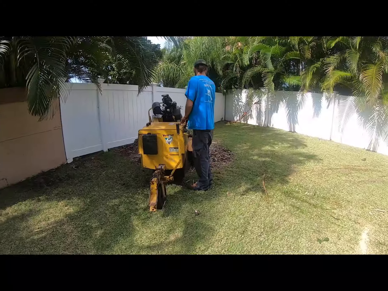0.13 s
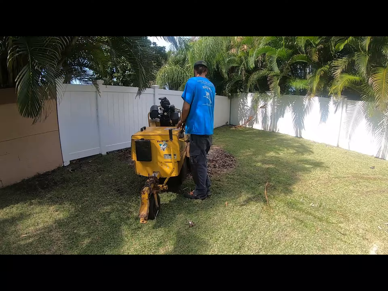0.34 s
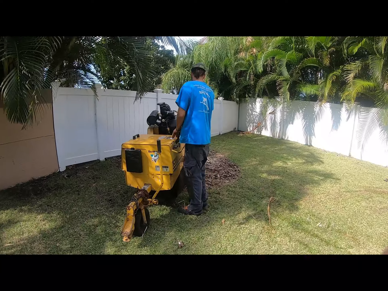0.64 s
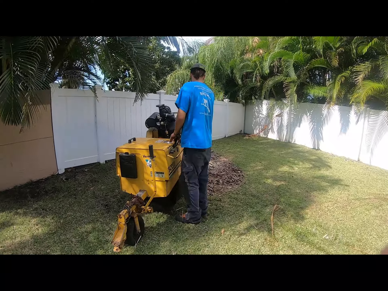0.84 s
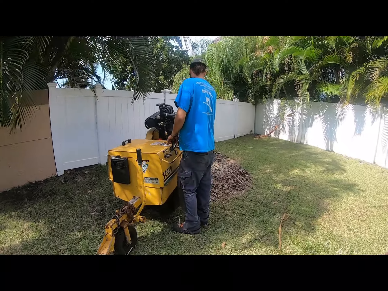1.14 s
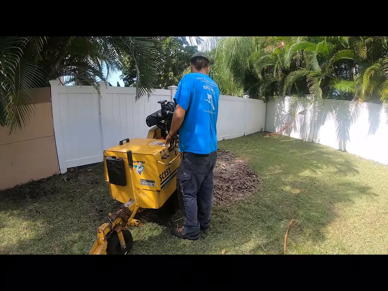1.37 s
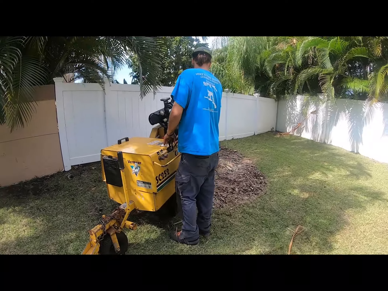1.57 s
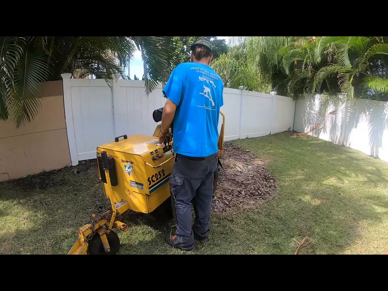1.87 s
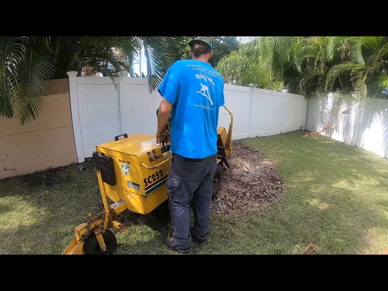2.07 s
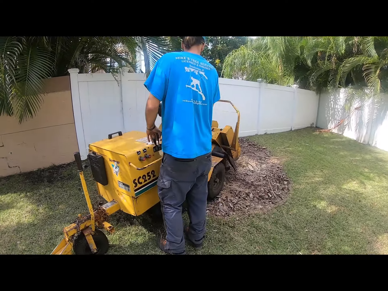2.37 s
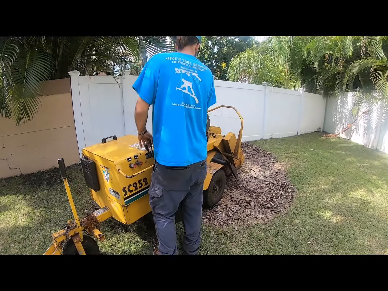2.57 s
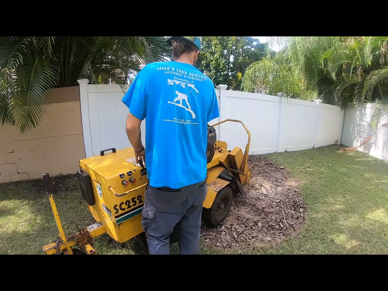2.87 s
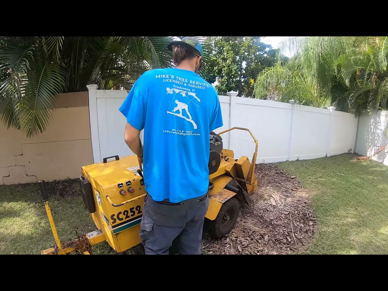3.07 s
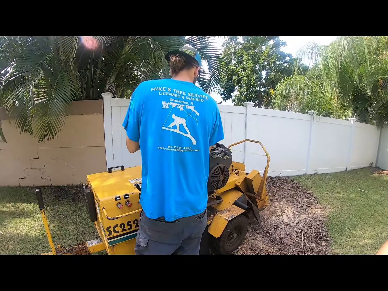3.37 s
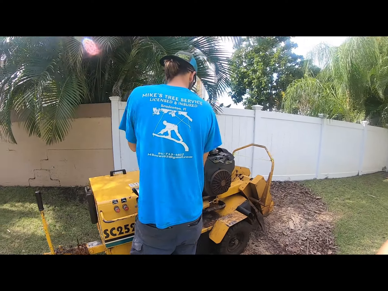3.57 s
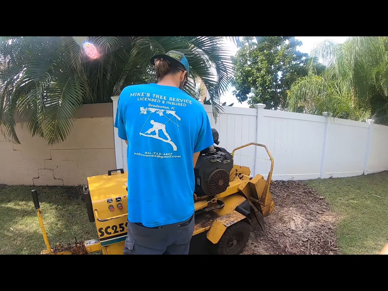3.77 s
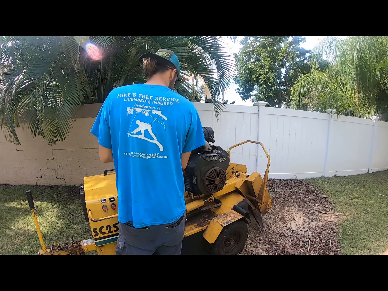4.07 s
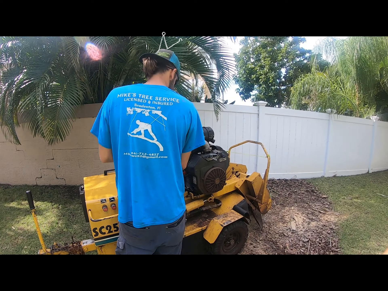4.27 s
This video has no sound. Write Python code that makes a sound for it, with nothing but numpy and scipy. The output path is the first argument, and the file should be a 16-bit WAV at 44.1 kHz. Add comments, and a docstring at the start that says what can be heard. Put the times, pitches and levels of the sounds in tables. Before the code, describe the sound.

After about 0.1 s of silence, a petrol stump grinder engine fades in within a tenth of a second, already running at speed in an open fenced yard. At first it is lighter, with a faint high whistle in the hiss until about 0.6 s. From 0.6 to 0.8 s the low exhaust boom swells strongly as the walking listener nears. The low, uneven two-cylinder throb, near 60 Hz, hunts gently: up around 0.65 s, down by 1.3 s, up near 2 s, sagging to its lowest at 3.5 s and partly recovering. Treble, fine valve ticking and thin whines are clearest around 1.2-1.9 s; more whine surfaces around 2.4-3 s. A brief roar surge and casing rasp come at 3.1-3.45 s. Fan noise then emerges, bass stays heavy, and the narrow image opens rightward. The steady roar is cut off abruptly at about 4.07 s, leaving silence.

```python
"""A fenced yard: a two-cylinder petrol stump grinder runs at speed while the listener walks round it with two microphones.
Its speed hunts slowly. Sines on multiples of the cycle give exhaust tones and whines from pump, fan and gears;
shaped noise gives roar, casing clatter and fan hiss; noise bursts in bright modes give a valve tick.
A faint high whistle lies in the hiss early on.
The sound fades in, stays narrow, opens to the right near the end and is cut off."""
import sys
import numpy as np
from scipy import signal
from scipy.fft import rfft, irfft
from scipy.io import wavfile

SR = 44100
rng = np.random.default_rng(int(sys.argv[2]) if len(sys.argv) > 2 else 0)


def inscribe(sig):
    """Save sig as 16-bit PCM at rate SR to the path in sys.argv[1].

    A 1-D sig is mono; a 2-D sig holds one channel per row.
    Samples are clipped to [-1, 1] before scaling.
    """
    pcm = np.round(np.clip(np.atleast_2d(sig).T, -1, 1) * 32767)
    wavfile.write(sys.argv[1], SR, pcm.astype(np.int16))


def ratio_of_db(decibels):
    """Turn decibels (scalar or array-like) into linear amplitude factors; 0 dB maps to 1."""
    return 10 ** (np.asarray(decibels, float) / 20)


N = 194569  # samples


def in_time(rows):
    """Turns the columns of a (time [s], ...) table into curves over all samples."""
    s, *columns = np.transpose(rows)
    return np.array([np.interp(np.arange(N) / SR, s, column) for column in columns])


def at_hz(points, hz, axis=1):
    """Reads one column of a spectrum on a log-frequency axis."""
    points = np.array(points)
    return np.interp(np.log(hz), np.log(points[:, 0]), points[:, axis])


def rms_one(x):
    """Scales to unit rms."""
    return x / np.sqrt(np.mean(x ** 2) + 1e-20)


def drift(rate_hz):
    """Slow chance with spread 1: noise through two equal low-pass poles, drawn at every 40th sample."""
    r = np.exp(-80 * np.pi * rate_hz / SR)
    white = rng.standard_normal(N // 40 + 4002)
    slow = signal.lfilter([1], [1, -2 * r, r * r], white)[4000:]  # settled part
    return np.interp(np.arange(N) / 40, np.arange(len(slow)), rms_one(slow - slow.mean()))


def resonance(x, hz, width_hz):
    """Two-pole resonance with gain 1 on top."""
    r = np.exp(-np.pi * width_hz / SR)
    poles = [1, -2 * r * np.cos(2 * np.pi * hz / SR), r * r]
    return signal.lfilter([(1 - r * r) / 2, 0, (r * r - 1) / 2], poles, x)


def stretch(start_s, end_s):
    """Rises softly from 0 to 1 round the start and sinks again round the end."""
    now = np.arange(N) / SR
    edge_s = .05
    return (np.tanh((now - start_s) / edge_s) - np.tanh((now - end_s) / edge_s)) / 2


# governor hunting: (time [s], engine speed [cycles/s])
ENGINE_SPEED = [(.1, 30.17), (.3, 30.3), (.65, 31.37), (.9, 30.42), (1.1, 28.93), (1.35, 28.7),
                (1.65, 29.96), (1.95, 31.38), (2.4, 31.11), (3.0, 30.37), (3.15, 29.4), (3.5, 27.83),
                (3.65, 28.13), (3.85, 29.28), (4.1, 29.3)]
START_TURN, TICK_TURN = -.068, .33  # crank position at the start and at the tick [cycles]


def crank_turns():
    """Adds up the hunting engine speed into the crank position in cycles."""
    return START_TURN + np.cumsum(in_time(ENGINE_SPEED)[0]) / SR


def working_noise(turns, repeating):
    """Part of the noise repeats every cycle, as the same parts meet again; the pattern changes over a few cycles."""
    steps = 1500  # contacts in one cycle
    patterns = rng.standard_normal((2, 40, steps))
    age = (turns + 1) / 5  # a new pattern every five cycles
    old = age.astype(int)
    blend = np.pi / 2 * (age % 1)
    contact = (turns % 1 * steps).astype(int)
    looped = patterns[:, old, contact] * np.cos(blend) + patterns[:, old + 1, contact] * np.sin(blend)
    return np.sqrt(repeating) * looped + np.sqrt(1 - repeating) * rng.standard_normal((2, N))


# muffler boom along the walk, before each band takes its share: (time [s], level [dB])
BOOM_ON_WALK = [(.2, -18.5), (.45, -15.5), (.8, -3.5), (1.5, -5), (2.1, -1), (2.6, 0.5), (3.1, 1), (3.5, 2),
                (4.1, 0.5)]
# treble along the walk, before each band takes its share: (time [s], level [dB])
TREBLE_ON_WALK = [(.2, -11), (.6, -10), (1.0, -5.5), (1.35, -4), (1.75, -2), (2.0, -6), (2.5, -8),
                  (3.2, -10), (3.45, -7.5), (4.1, -4.5)]
# brief surges of the exhaust roar, before the shares: (time [s], half-length [s], level [dB])
ROAR_SURGES = [(.56, 0.12, 8.5), (.92, 0.19, 4.5), (3.14, .12, 7), (3.35, .1, 3.5)]
# the fan side comes out from behind the operator: (from time [s], to time [s])
FAN_COMES_OUT = (2.81, 3.96)
# the casing rasps briefly, before the shares: (from time [s], to time [s], level [dB])
CASING_RASP = (3.25, 3.45, 3)
# noise reaching the listener: (frequency [Hz], level [dB], share of boom, share of treble, share of surges,
# gain with the fan fully in view [dB], share of rasp)
NOISE_REACH = [(152, -23, .15, 0.093, 1.1, -4, .01), (282, -19, 0.94, 0.15, 0.11, 3.5, .01),
               (410, -20.5, 0.79, -0.22, 0.92, -2.5, .01), (700, -25, 0.23, 0.27, .1, -2.5, .01),
               (1250, -24.5, 0.13, 0.26, .1, -3.5, .1), (2400, -30, .2, -0.25, 0.087, 0.5, 1.1),
               (4000, -34.5, -0.082, 0.18, .05, 0.4, .6), (6570, -48, -0.39, .2, .01, 11.5, .4),
               (10040, -49, -0.3, 1, .01, 7, .2), (12700, -52.5, .1, 1.1, .01, 2.5, .1)]


def reach_levels():
    """Level of each noise band over time: boom, treble, surges, fan and rasp, each taken in its share."""
    now = np.arange(N) / SR
    boom_db, treble_db = in_time(BOOM_ON_WALK)[0], in_time(TREBLE_ON_WALK)[0]
    surge_db = sum(db * np.exp(-((now - s) / half) ** 2) for s, half, db in ROAR_SURGES)
    fan = np.interp(now, FAN_COMES_OUT, (0, 1))
    rasp_start, rasp_end, rasp_db = CASING_RASP
    controls = np.array([np.ones(N), boom_db, treble_db, surge_db, fan, rasp_db * stretch(rasp_start, rasp_end)])
    return np.array(NOISE_REACH)[:, 1:] @ controls


# colour of the noise, only its shape matters: (frequency [Hz], relative density [dB])
ROAR_COLOUR = [(90, 3), (213, -1), (274, -2.5), (440, -12.5), (560, -29.5), (1000, -25), (1600, -30),
               (2400, -32), (3800, -28), (6500, -38), (10300, -41), (11200, -45.5), (14000, -51.5),
               (15600, -100)]
# muffler shell, casing and guard ring in the noise: (frequency [Hz], width [Hz], lift [dB])
CASING_RINGS = [(430, 70, 3), (960, 80, 2), (1250, 90, 6), (1420, 80, 4), (1800, 110, 3), (2330, 160, 5),
                (2850, 220, 3), (3800, 300, 2), (8100, 500, 2), (10200, 700, 3)]


def roar(turns, throb_db, patchy_db, grain_db):
    """Turbulent exhaust, casing and fan noise in third-octave bands, puffing with each firing; two unrelated draws."""
    hz = np.maximum(np.fft.rfftfreq(N, 1 / SR), 1)
    rings_db = sum(db / (1 + (2 * (hz - top) / width) ** 2) for top, width, db in CASING_RINGS)
    rumble_db = -11 / (1 + (hz / 118) ** 8)  # little noise lies between the lowest tones
    colour = ratio_of_db(at_hz(ROAR_COLOUR, hz) + rings_db + rumble_db) * (hz > 22)
    white = rfft(working_noise(turns, repeating=.2)) * colour
    # power of the plain colour round each centre, so that the columns read as band levels
    plain = [np.sum(colour[(hz > .8 * c) & (hz < 1.25 * c)] ** 2) / len(hz) for c, *_ in NOISE_REACH]
    reach_db = reach_levels() - 10 * np.log10(plain)[:, None]
    # twice a cycle, with one puff of the two stronger
    puff = np.cos(4 * np.pi * (turns - TICK_TURN)) + 0.98 * np.cos(2 * np.pi * (turns - TICK_TURN))
    shared_db = throb_db * puff + grain_db * drift(82.0)
    reach_hz = np.array(NOISE_REACH)[:, 0]
    out = np.zeros((2, N))
    for centre in 20 * 2 ** (np.arange(30) / 3):
        share = np.cos(np.pi / 2 * np.clip(3 * np.log2(hz / centre), -1, 1)) ** 2
        # the level is blended between the two nearest rows
        place = np.interp(np.log(centre), np.log(reach_hz), np.arange(len(reach_hz)))
        low = min(int(place), len(reach_hz) - 2)
        level_db = reach_db[low] + (place - low) * (reach_db[low + 1] - reach_db[low])
        out += irfft(white * share, N) * ratio_of_db(level_db + shared_db + patchy_db * drift(5.2))
    return out


# bright modes, each passed twice: (frequency [Hz], width of one pass [Hz], relative level [dB])
VALVE_MODES = [(8300, 1500, 1), (10200, 1400, 1), (12300, 1800, -5)]
# heard best from two sides of the engine: (from time [s], to time [s], level [dB])
TICK_SIDES = [(0, .42, -66), (1.15, 1.92, -54.5)]


def valve_tick(turns, burst_s, spread_db):
    """Once a cycle a valve seats: a short burst of noise in bright modes, two unrelated draws."""
    hidden_db = -74
    tick_db = hidden_db + sum((db - hidden_db) * stretch(a, b) for a, b, db in TICK_SIDES)
    seats = np.diff(np.floor(turns - TICK_TURN), prepend=-1) > 0
    sizes = ratio_of_db(spread_db * rng.standard_normal(200))[np.cumsum(seats)]
    fall = np.exp(-1 / (burst_s * SR))
    envelope = signal.lfilter([1], [1, -2 * fall, fall * fall], seats * sizes + 1e-18)
    burst = envelope * rng.standard_normal((2, N))
    ringing = sum(ratio_of_db(db) * resonance(resonance(burst, hz, width), hz, width) for hz, width, db in VALVE_MODES)
    return ratio_of_db(tick_db) * rms_one(ringing)


def tone(turns, order, db, wander):
    """A sine on a multiple of the cycle; odd ones lead by a quarter wave, the path length wanders a little."""
    waves = order * turns + order % 2 / 4 + wander * drift(1.2)
    return np.sqrt(2) * ratio_of_db(db) * np.cos(2 * np.pi * waves)


# exhaust at its weakest: (multiple of the cycle rate, level [dB], wavering [dB], wander [waves])
EXHAUST = [(1, -29.5, .7, .02), (2, -19, .4, 0), (3, -31, 1, .02), (3.6, -45, 1.5, .08), (4, -33, 3, .03),
           (5, -28, 1.5, .05), (6, -36, 1.5, .05), (7.2, -33, 2, .08), (8, -39, 2, .05), (12, -44, 3.5, .1),
           (13, -37, 3, .095), (14, -36, 3, .1)]
# thin lines from pump, fan and gears at their weakest:
# (multiple of the cycle rate, level [dB], wavering [dB], wander [waves])
THIN_LINES = [(21.8, -50, 2, .1), (30.6, -48, 2, .1), (40, -46, 2, .1), (43.6, -50, 2, .1),
              (49.7, -60, 2, .1)]
# a tone stands out along a stretch of the walk: (multiple, from time [s], to time [s], lift [dB])
TONE_SWELLS = [(1, .62, 2.8, 5), (2, .62, 2.1, 2), (2, 1.05, 1.75, 3), (2, 2.5, 4.3, 1.5),
               (2, 3.15, 4.3, 2), (3, .62, 1.68, 6.5), (3, 3.5, 4.3, 9), (3.6, 1.5, 4.3, 13),
               (3.6, 2.95, 4.3, 10), (5, .47, 2.4, 6.5), (5, 3.45, 4.3, 4.5), (6, 0, .95, 11),
               (6, .4, .68, 10), (6, 1.5, 3.1, 9), (6, 2.1, 3.05, 3.5), (7.2, .95, 3.6, 8.5),
               (8, .65, 4.3, 8), (8, 2.3, 3.05, 7), (12, .7, 4.3, 13), (21.8, .6, 1.15, 12),
               (21.8, 1.5, 2.5, 8), (21.8, 3.8, 4.3, 11), (30.6, 1.15, 1.45, 12), (30.6, 2.35, 2.95, 13),
               (40, 1.1, 3.05, 9), (40, 2.45, 2.95, 5), (43.6, .55, 1.75, 9), (43.6, 2.45, 4.3, 8),
               (43.6, 2.45, 3.05, 8), (49.7, .9, 1.75, 20)]


def locked_tones(turns):
    """Uneven firing of two cylinders, pump, fan and gears sing on multiples of the cycle; each wavers and swells."""
    out = 0
    for order, db, waver_db, wander in EXHAUST + THIN_LINES:
        lift_db = sum(lift * stretch(a, b) for k, a, b, lift in TONE_SWELLS if k == order)
        out = out + tone(turns, order, db + lift_db + waver_db * drift(3.5), wander)
    return out


# the whistle: (time [s], level [dB])
WHISTLE_LEVEL = [(.15, -54), (.33, -54), (.5, -59), (.65, -90)]


def whistle(hz, width_hz):
    """A faint narrow whistle high in the hiss: noise through two equal resonances."""
    narrow = resonance(resonance(rng.standard_normal(N), hz, width_hz), hz, width_hz)
    return ratio_of_db(in_time(WHISTLE_LEVEL)[0]) * rms_one(narrow)


# the two microphone ports at 0 dB width: (frequency [Hz], lean to the right against the middle [dB],
# unrelated part against the second noise draw [dB])
MICROPHONE_PORTS = [(200, -71.5, -44.5), (321, -62, -44), (533, -24, -17.5), (800, -22, -19),
                    (1700, -13, -15), (3800, -17, -12), (5950, -7.5, -4.5), (11000, -5, -3.5),
                    (15800, -14.5, 4.5)]
# stereo width below the split: (time [s], level [dB])
LOW_WIDTH = [(3.05, -30.5), (3.2, -14), (3.5, -0.5), (3.9, 5.5)]
# stereo width above the split: (time [s], level [dB])
HIGH_WIDTH = [(.95, -33), (1.3, 0), (4.1, -3)]


def ports(middle, unrelated):
    """The side signal: the middle leaning right with a small phase turn, plus sound that differs between ports."""
    split_hz, phase_turn_rad = 11200, .35
    hz = np.maximum(np.fft.rfftfreq(N, 1 / SR), 1)
    side = rfft(unrelated) * ratio_of_db(at_hz(MICROPHONE_PORTS, hz, axis=2))
    side -= rfft(middle) * ratio_of_db(at_hz(MICROPHONE_PORTS, hz)) * np.exp(1j * phase_turn_rad)
    below = irfft(side * (hz < split_hz), N) * ratio_of_db(in_time(LOW_WIDTH)[0])
    above = irfft(side * (hz >= split_hz), N) * ratio_of_db(in_time(HIGH_WIDTH)[0])
    return below + above


def scene():
    """All parts but the whistle turn with one crankshaft; the two ports hear middle plus and minus side."""
    turns = crank_turns()
    noisy = roar(turns, throb_db=0.28, patchy_db=1.0, grain_db=0.7)
    noisy += valve_tick(turns, burst_s=.0013, spread_db=2.2)
    middle = noisy[0] + locked_tones(turns)
    middle += whistle(hz=8070, width_hz=100)
    side = ports(middle, noisy[1])
    return np.array([middle + side, middle - side])  # left, right


def top_cut(x):
    """Nothing passes above the cut-off."""
    return signal.sosfilt(signal.butter(12, 15700, fs=SR, output="sos"), x)


# opening of the sound: (time [s], level [dB])
OPENING = [(.108, -81), (.12, -36), (.135, -17.5), (.155, -8), (.19, 0)]


def record(dry):
    """Peaks are rounded; the sound fades in and is cut within a millisecond."""
    cut_s = 4.0665
    rounded = 1.422 * np.tanh(dry / 1.356)
    shaped = rounded * ratio_of_db(in_time(OPENING)[0])
    now = np.arange(N) / SR
    sounding = (now > OPENING[0][0]) * np.clip((cut_s - now) / .001, 0, 1)
    mix = np.clip(shaped, -1, 1) * sounding
    return top_cut(mix)


dry = scene()
out = record(dry)
inscribe(out)
```